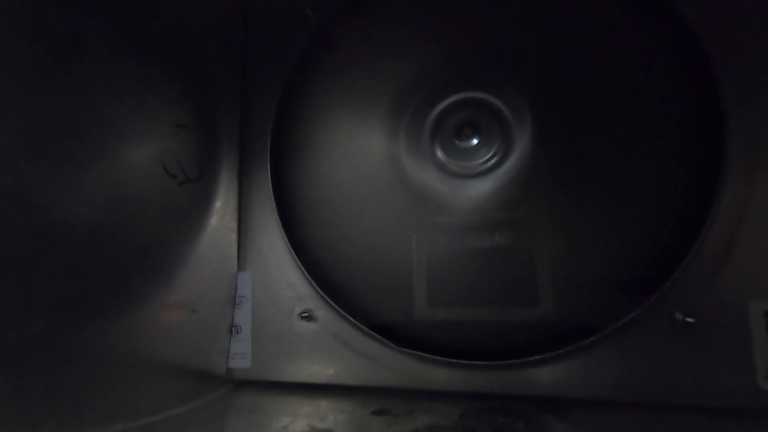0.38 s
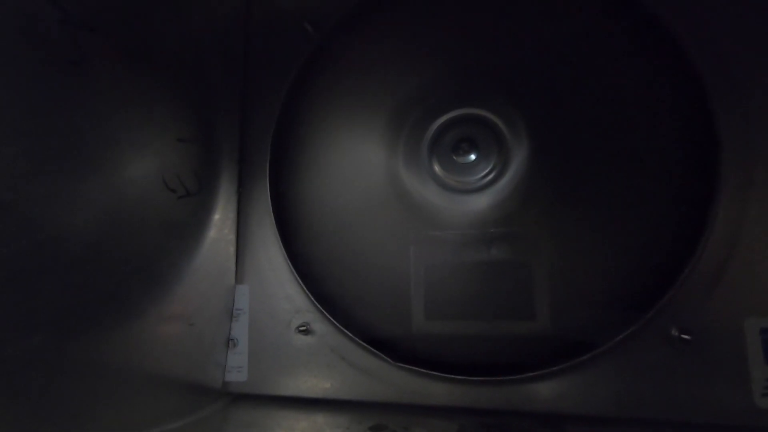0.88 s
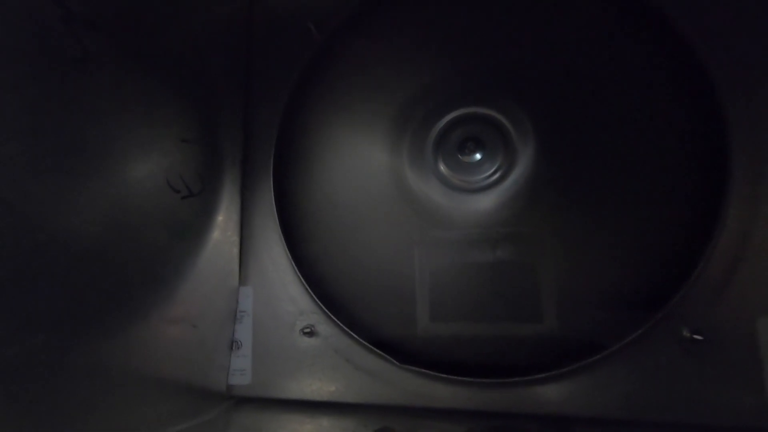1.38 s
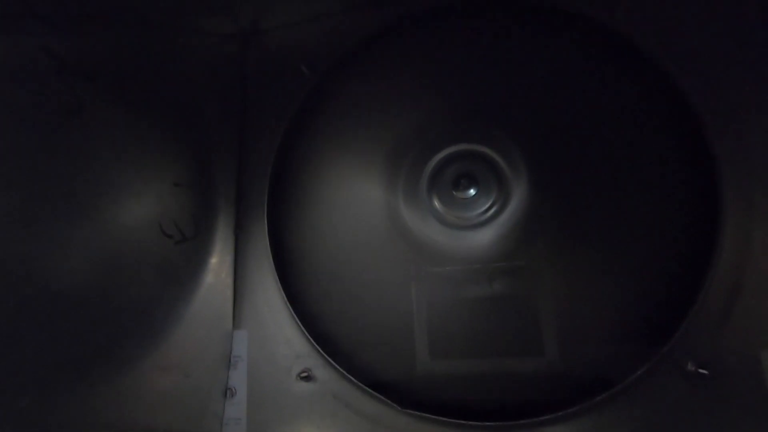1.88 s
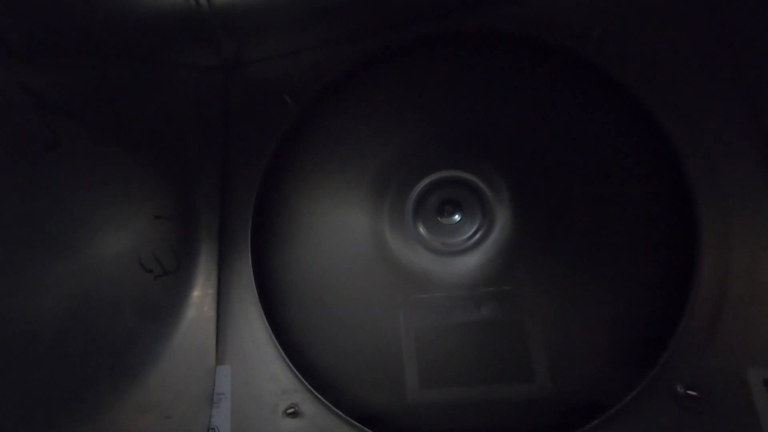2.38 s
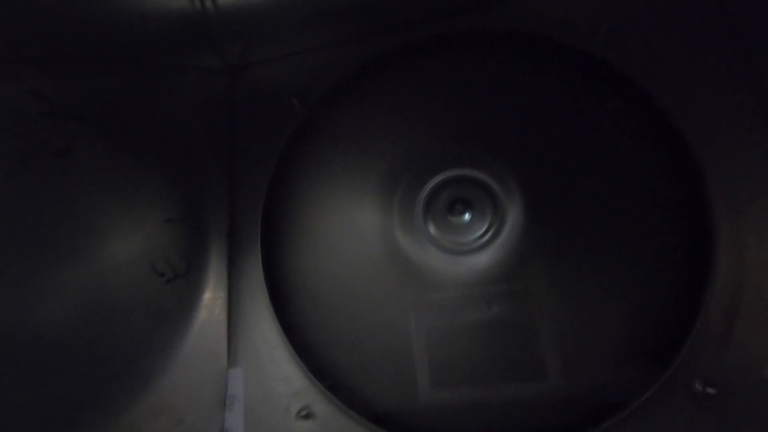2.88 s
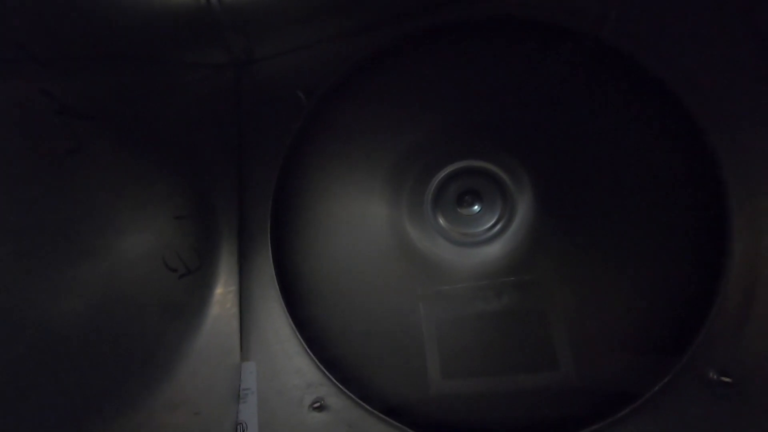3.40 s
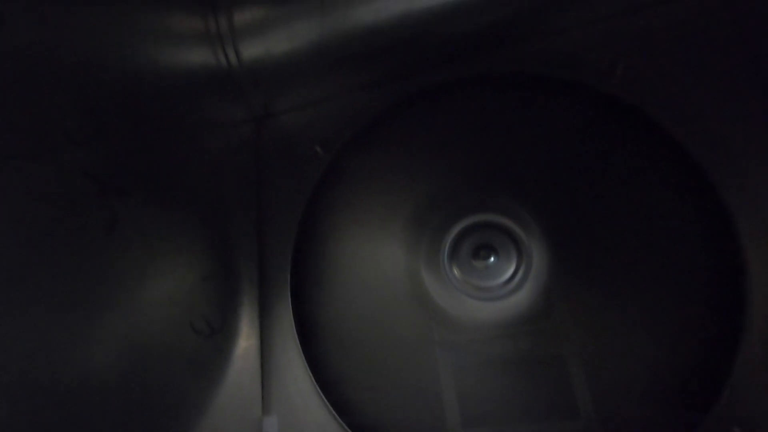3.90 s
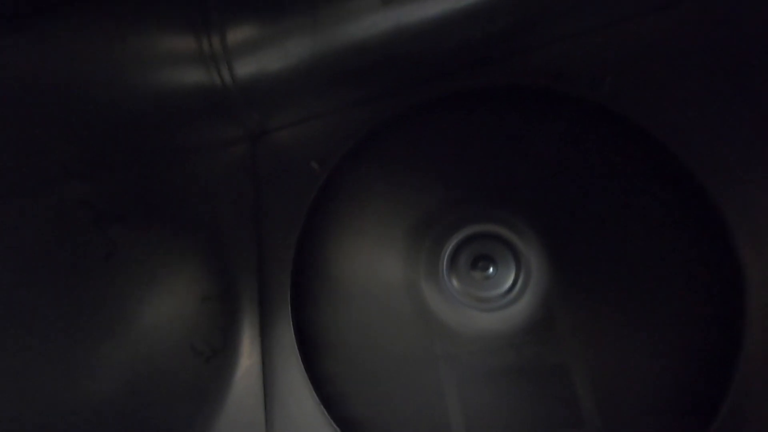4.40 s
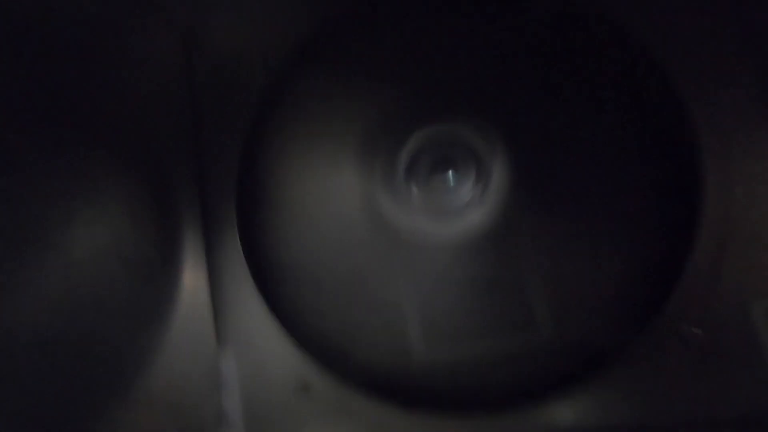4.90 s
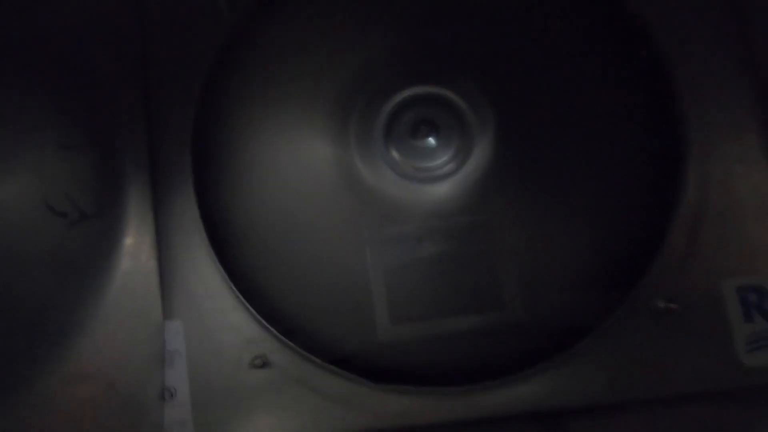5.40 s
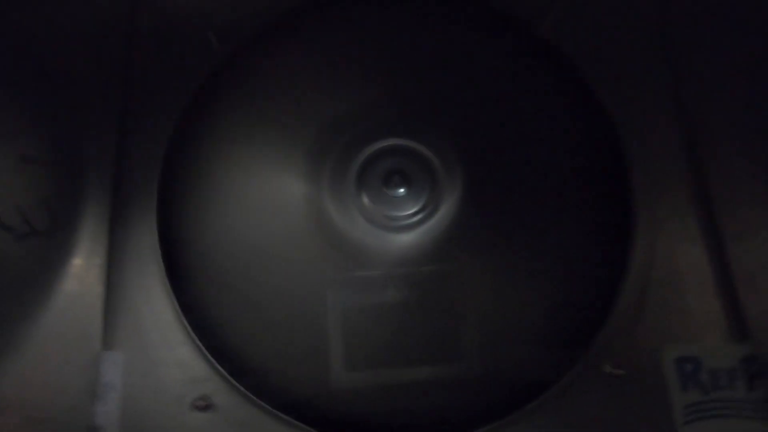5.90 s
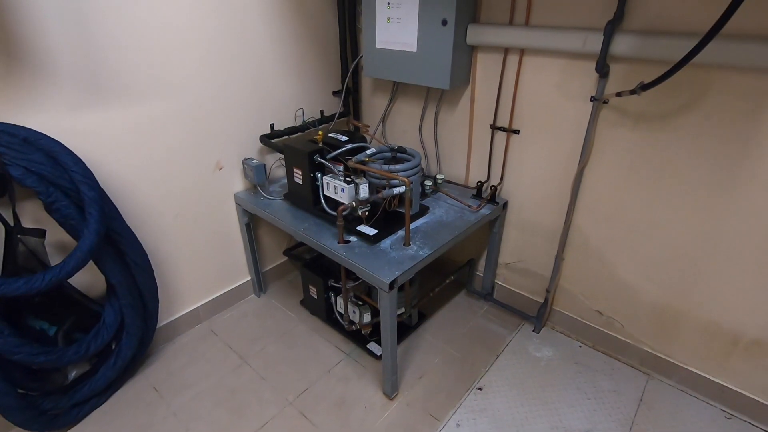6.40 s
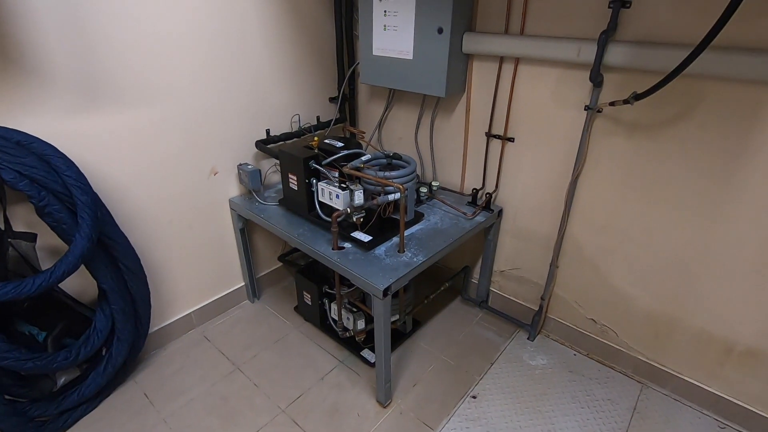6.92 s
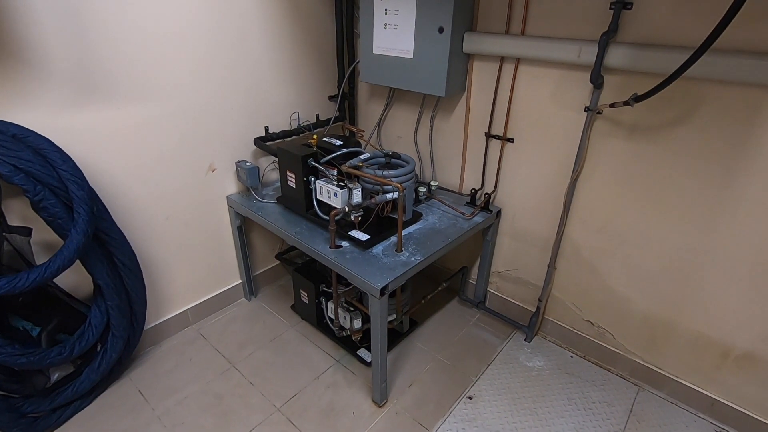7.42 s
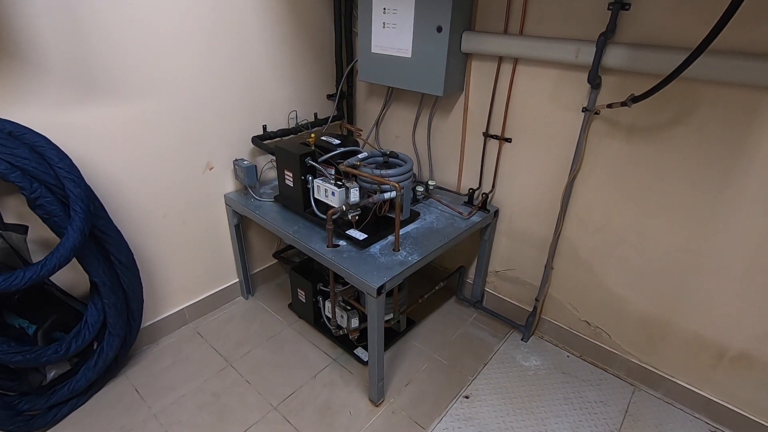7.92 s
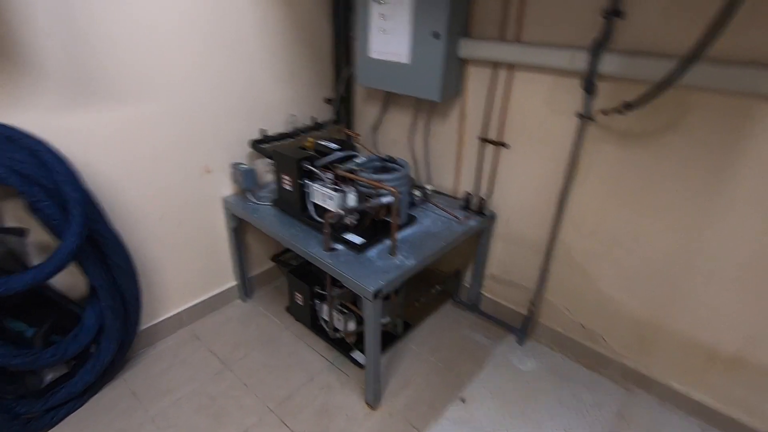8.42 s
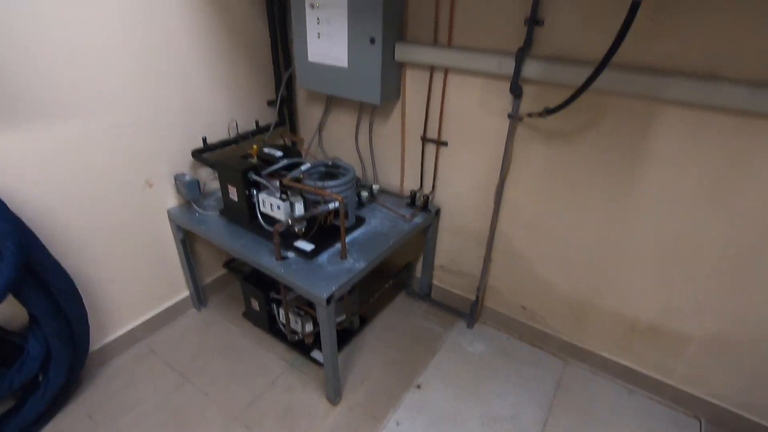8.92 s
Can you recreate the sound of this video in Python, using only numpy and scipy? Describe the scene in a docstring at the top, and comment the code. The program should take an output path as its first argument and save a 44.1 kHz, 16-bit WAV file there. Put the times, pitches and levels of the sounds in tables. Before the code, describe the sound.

Deep fan hum and buffeting air rumble close by, cut with a click to brief silence, then a compressor hums, throbs and whines.

```python
"""A cold room, close to its fan: turbulent air buffets the microphone over a mains hum, a blade tone and
the broadband rush through the fins; the level steps up early on. A hard cut leads to brief silence, then a
machine room fades in, where a small compressor unit hums, throbs, whines and clatters once per shaft turn.
Ticks, one in the cold room and two in the machine room, and a rub excite the recorder's case.
Flow noise is filtered random noise, tones are unsteady sines, clatter is a periodic waveform."""
import sys
import numpy as np
from scipy import signal
from scipy.fft import rfft, irfft
from scipy.io import wavfile
from scipy.ndimage import uniform_filter1d, map_coordinates

SR = 44100
rng = np.random.default_rng(int(sys.argv[2]) if len(sys.argv) > 2 else 0)


def master(y):
    """Save y as 16-bit WAV."""
    cut = np.clip(np.atleast_2d(y).T, -1, 1)
    pcm = np.round(cut * 32767)  # scale
    wavfile.write(sys.argv[1], SR, pcm.astype(np.int16))


def amp(db):
    return 10 ** (np.asarray(db, float) / 20)


N = 399105
T = np.arange(N) / SR  # time [s]

# hum of the fan motor, growing as the microphone drifts: (time [s], rms level [dB])
MOTOR_HUM = [(0.8, -25.5), (2.0, -26.5), (2.6, -22.5), (4.6, -20), (5.6, -21), (6.0, -22.5)]
# spectrum of the air buffets: (frequency [Hz], relative density [dB])
BUFFET_SPECTRUM = [(8, -34.5), (25, -0.5), (40, 0.5), (70, -2.5), (110, -2), (160, -15), (220, -19.5),
                   (320, -27.5), (500, -50.5), (900, -130)]
# spectrum of the rush through the fins: (frequency [Hz], relative density [dB])
FIN_SPECTRUM = [(90, -25.5), (150, 0), (210, -8.5), (270, -3.5), (360, -10.5), (490, -7.5), (570, -11.5),
                (850, -13), (1500, -14), (2100, -17), (3200, -18), (4200, -27), (5000, -31.5),
                (5600, -45.5), (7000, -45.5), (9000, -47.5), (10500, -60.5), (11500, -60.5), (12800, -69.5),
                (14500, -87.5), (16000, -100)]
# resonances of the fan housing and fins: (frequency [Hz], width [Hz], gain [dB])
HOUSING_MODES = [(269.4, 37, 4.5), (241.3, 14, 6), (420, 37, 4), (469, 29, 1.5), (519.6, 24, 7.5),
                 (620, 52, 5.5), (1090, 65, 4), (1450, 250, 4)]
# bands of the rush that swell as the microphone moves:
# (time [s], half span [s], frequency [Hz], half width [Hz], level [dB])
RUSH_SWELLS = [(2.2, 0.22, 1380, 250, -46), (4.25, 0.13, 1450, 300, -38), (4.5, 0.81, 620, 201.5, -34.5),
               (5.01, 0.05, 303, 200, -27), (5.7, 0.37, 1024, 253, -36), (4.8, .9, 8200, 2500, -68)]
# throbbing note at its crests: (time [s], rms level [dB])
THROB_LEVEL = [(6.3, -30), (7.0, -31), (7.95, -23.5), (8.4, -29.5), (9.0, -28.5)]
# whine of the unit: (time [s], rms level [dB])
WHINE_LEVEL = [(6.6, -34.5), (6.8, -31.5), (8.5, -32), (8.8, -36), (9.03, -39)]
# spectrum of the machine-room drone: (frequency [Hz], relative density [dB])
DRONE_SPECTRUM = [(10, -16), (25, -6.5), (50, -13.5), (75, -17), (100, -3), (200, -11), (350, -8),
                  (550, -22), (900, -19), (1500, -41), (3000, -130)]
# low resonances of the machine room and frame: (frequency [Hz], width [Hz], gain [dB])
ROOM_RESONANCES = [(91.5, 30, 11.5), (171, 54, 13.5), (240.6, 46, 15.5), (325, 47, 9), (418, 22, 4.5),
                   (470, 33, 7.5), (510.6, 23, 12.5)]
# spectrum of the condenser hiss: (frequency [Hz], relative density [dB])
CONDENSER_SPECTRUM = [(300, -40), (550, 0.0), (700, -4.4), (950, -7.9), (1400, -12.7), (1750, -13.3),
                      (2300, -18.0), (3000, -12.3), (3600, -21.7), (4300, -19.2), (4900, -27.6),
                      (5500, -34.3), (7000, -36.3), (9000, -36.7), (10300, -45.6), (11200, -42.3),
                      (13000, -47.4), (14500, -56.9), (16000, -100)]
# resonances of the compressor shell: (frequency [Hz], width [Hz], gain [dB])
SHELL_MODES = [(1760, 200, 3.5), (3080, 240, 1), (4500, 240, 6)]
# other steady tones of the unit: (frequency [Hz], rms level [dB])
UNIT_TONES = [(661.1, -52), (780.9, -51), (798.1, -49), (1500, -64)]
# usual level of the valve clatter's shaft orders: (frequency [Hz], rms level [dB])
VALVE_SPECTRUM = [(1402, -63), (2337, -70), (3272, -66), (4207, -67), (5141, -82), (6076, -84), (7011, -80),
                  (7946, -83), (8881, -84), (9816, -90), (10750, -96), (11685, -99), (12620, -103)]
# shaft orders that stand out: (order [multiple of the shaft rate], rms level [dB])
STRONG_ORDERS = [(1, -42), (2, -42), (3, -39), (4, -44), (5, -45), (6, -44), (7, -48), (8, -53), (16, -58),
                 (18, -55), (20, -59), (22, -57), (24, -60), (29, -57), (31, -58), (51, -59), (52, -61),
                 (53, -61), (56, -61), (64, -67), (65, -66), (68, -67), (70, -57), (72, -63), (73, -59),
                 (75, -63), (77, -63), (79, -67), (88, -74), (89, -71), (96, -76), (97, -74), (108, -75),
                 (120, -77), (123, -77), (125, -78), (127, -76), (134, -76), (143, -78), (174, -87),
                 (178, -88), (188, -84)]
# fingernail ticks on the case: (time [s], gain [dB])
NAIL_TICKS = [(1.507, -50.5), (8.44, -16), (8.4803, -36.5)]
# ringing modes of the case: (frequency [Hz], relative level [dB], 60 dB decay time [s])
CASE_MODES = [(1900, -6, .004), (2930, -4, 0.0045), (3870, -3, .008), (4400, -2, 0.0087),
              (5600, -9, 0.0027), (7860, 1, 0.0022), (10100, -16, .004), (12900, -17, .003)]
# spectrum of the rub: (frequency [Hz], relative density [dB])
RUB_SPECTRUM = [(600, -120), (1500, -30), (3600, -14), (4500, 0), (5300, -15), (8000, -19), (10500, -28),
                (14000, -38), (16000, -70)]

MAINS_HZ, BLADE_HZ, SHAFT_HZ, WHINE_HZ = 119.95, 262.4, 58.426, 750
BLADE_DB, BUFFET_DB, RUSH_DB = -35.5, -20, -27  # fan at full level
DRONE_DB, HISS_DB, UNIT_HUM_DB = -25.5, -40, -24  # machine room once faded in
THROB_HZ, THROB_PER_S, CREST_S, THROB_DEPTH = 177.8, 2.74, 7.96, 0.89  # depth 0-1
RUB_S, RUB_ATTACK_S, RUB_DB, RUB_FADE_DB_PER_S = 8.425, .015, -45, 20
STEP_S, QUIET_DB = .702, -15.5  # the fan is quieter until the step
CUT_S, CLICK_DB, CLICK_S = 6.0097, -21, .001  # the click rises by a factor e in CLICK_S
# fade-in: start, time scale of the opening, gain at the start of the slow rise, length of that rise
FADE_S, OPEN_S, OPEN_DB, RISE_S = 6.118, 0.064, -9, 0.45


def unit(x):
    """Normalises the mean power to 1."""
    return x / np.sqrt(np.mean(x ** 2) + 1e-20)


def along(points, hz):
    """Interpolates a spectrum linearly in dB over logarithmic frequency."""
    f, v = np.transpose(points)
    return np.interp(np.log(hz + 1), np.log(f + 1), v)


def curve(rows):
    """Interpolates a level linearly in dB over time."""
    s, db = np.transpose(rows)
    return np.interp(T, s, db)


def wobble(rate):
    """Slow random fluctuation: a spline through normal deviates, rate knots a second."""
    return map_coordinates(rng.standard_normal(int(N * rate / SR) + 4), [T * rate])


def air(spectrum, modes, patchy_db):
    """Turbulence as filtered noise of rms 1, with random gain patches and resonant bumps."""
    z = signal.stft(rng.standard_normal(N + SR), nperseg=512)[2]
    field = uniform_filter1d(rng.standard_normal(z.shape), size=5, axis=0)  # over frequency
    field = uniform_filter1d(field, size=14, axis=1)  # over time
    noise = signal.istft(z * amp(patchy_db * unit(field)), nperseg=512)[1]
    hz = np.fft.rfftfreq(len(noise), 1 / SR)
    db = along(spectrum, hz)
    for centre, width, gain in modes:
        db = db + gain / (1 + (2 * (hz - centre) / width) ** 2)
    return unit(irfft(rfft(noise) * amp(db), len(noise))[:N])


def tone(hz, db, waver_db=.7):
    """Phase is the integral of frequency: a sine at an rms level that wavers."""
    turns = np.cumsum(hz + 0 * T) / SR + rng.random()
    return np.sqrt(2) * amp(db + waver_db * wobble(5.3)) * np.sin(2 * np.pi * turns)


def room_drone():
    """Modal resonance: low noise is reinforced at the modes of room and frame."""
    return amp(DRONE_DB) * air(DRONE_SPECTRUM, ROOM_RESONANCES, patchy_db=-2.0)


def condenser_hiss():
    """Broadband flow noise, coloured by the shell resonances."""
    return amp(HISS_DB) * air(CONDENSER_SPECTRUM, SHELL_MODES, patchy_db=-0.1)


def unit_hum():
    """Superposition of the mains hum and the unit's other tones."""
    others = sum(tone(hz, db, waver_db=2.5) for hz, db in UNIT_TONES)
    return tone(MAINS_HZ, UNIT_HUM_DB) + others


def throbbing_note():
    """Amplitude modulation: a low, unsteady note swells and sinks periodically."""
    beat = 1 - THROB_DEPTH * np.sin(np.pi * THROB_PER_S * (T - CREST_S)) ** 2
    return beat * tone(THROB_HZ + 2.496 * wobble(8), curve(THROB_LEVEL), waver_db=1.5)


def whine():
    """Amplitude modulation at the mains hum rate puts sidebands around the whine."""
    pulsing = 1 + 0.2 * np.sin(2 * np.pi * MAINS_HZ * T)
    return pulsing * tone(WHINE_HZ, curve(WHINE_LEVEL), waver_db=0.2)


def valve_clatter():
    """Periodicity: one burst repeated every shaft turn has a line spectrum of shaft orders."""
    turn = np.arange(8192) / 8192
    burst = rng.standard_normal(len(turn)) * (.6 + np.exp(-turn / .2))
    order = np.arange(len(turn) // 2 + 1)
    db = along(VALVE_SPECTRUM, order * SHAFT_HZ) + 3.5 * rng.standard_normal(len(order))
    db[(order < 21) | (order > 240)] = -200
    for k, level in STRONG_ORDERS:
        db[round(k)] = level
    phase = np.angle(rfft(burst))  # the burst lends only its phases
    cycle = irfft(amp(db) * np.exp(1j * phase)) * len(turn) / np.sqrt(2)  # amp(db) is each order's rms
    angle = (T * SHAFT_HZ + 0.0019 * wobble(2.2)) % 1  # slightly uneven rotation
    return amp(0.54 * wobble(13)) * np.interp(angle, turn, cycle, period=1)


def machine_room():
    """Superposition of the sources of the compressor unit and its room."""
    return room_drone() + condenser_hiss() + unit_hum() + throbbing_note() + whine() + valve_clatter()


def nail_ticks():
    """Impulse response: each fingernail contact excites the decaying modes of the case."""
    out, t = np.zeros(N + SR), np.arange(SR // 20) / SR
    ring = sum(amp(g - 60 * t / t60) * np.sin(2 * np.pi * hz * t) for hz, g, t60 in CASE_MODES)
    band = signal.butter(2, [2500, 9000], 'band', fs=SR, output='sos')
    crack = signal.sosfilt(band, rng.standard_normal(len(t)))
    ring += 1.07 * amp(-60 * t / 0.0078) * crack  # the crack of contact
    ring *= 1 - np.exp(-t / 0.00011)  # the nail lands softly
    for s, db in NAIL_TICKS:
        out[round(s * SR):][:len(t)] += amp(db) * ring
    return out[:N]


def case_rub():
    """Friction noise: a hand's stroke hisses in clumps and decays exponentially."""
    since = np.maximum(T - RUB_S, 0)
    stroke = np.minimum(since / RUB_ATTACK_S, 1) * amp(RUB_DB - RUB_FADE_DB_PER_S * since)
    return stroke * amp(1.5 * wobble(60)) * air(RUB_SPECTRUM, [(4400, 300, 4)], patchy_db=1.5)


def motor_hum():
    """Harmonic series: mains hum and its weaker octave."""
    db = curve(MOTOR_HUM)
    return tone(MAINS_HZ, db) + tone(2 * MAINS_HZ, db - 19)


def blade_tone():
    """Periodic blade passage: a tone of wandering pitch, with another at half its nominal pitch."""
    blade = tone(BLADE_HZ + .6 * wobble(3), BLADE_DB, waver_db=1.8)
    return blade + tone(BLADE_HZ / 2, BLADE_DB - 2, waver_db=2)


def fin_rush():
    """Broadband flow noise, shaped by resonances; single bands swell in Gaussian envelopes."""
    rush = amp(RUSH_DB + 0.084 * wobble(8)) * air(FIN_SPECTRUM, HOUSING_MODES, patchy_db=0.99)
    for s, span, hz, w, db in RUSH_SWELLS:
        band = [(hz / 4, -120), (hz - w, -15), (hz, 0), (hz + w, -15), (hz * 4, -120)]
        swell = np.exp(-((T - s) / span) ** 2)
        rush = rush + amp(db) * swell * air(band, [], patchy_db=0.5)
    return rush


def air_buffets():
    """Turbulent pressure on the microphone: low noise with random gusts."""
    gusts = unit(amp(0.28 * wobble(3.8)) * air(BUFFET_SPECTRUM, [], patchy_db=0.7))
    return amp(BUFFET_DB + 0.9 * wobble(1.2)) * gusts


def fan():
    """Superposition of the fan's tones and flow noise."""
    return motor_hum() + blade_tone() + fin_rush() + air_buffets()


def scene():
    """Gain envelopes: the fan steps up and is cut with a click; the machine room fades in."""
    click = amp(CLICK_DB) * np.exp(-abs(T - CUT_S) / CLICK_S)
    step = amp(QUIET_DB * np.clip((STEP_S - T) / .003 + .5, 0, 1))  # a 3 ms ramp
    cold_room = (fan() * step + click) * (T < CUT_S)
    since = np.maximum(T - FADE_S, 0)
    opening = 1 - np.exp(-(since / OPEN_S) ** 3)
    rise = amp(OPEN_DB * np.clip(1 - since / RISE_S, 0, 1))
    return (cold_room + machine_room() * opening * rise + nail_ticks() + case_rub())[None]


def band_limit(x):
    """A steep low-pass at the top of the band."""
    return signal.sosfilt(signal.butter(12, 15500, fs=SR, output="sos"), x)


def record(dry):
    """Signal chain: the finished mix passes through the last stage."""
    return band_limit(dry)


dry = scene()
out = record(dry)
master(out)
```